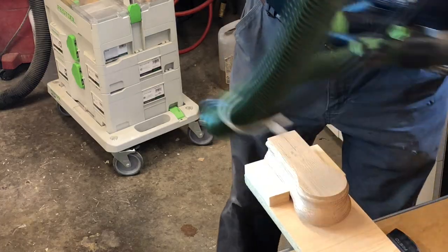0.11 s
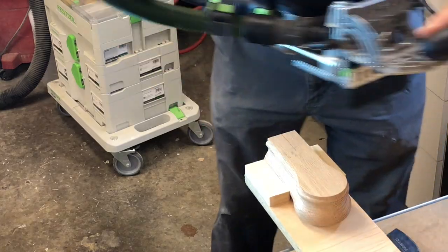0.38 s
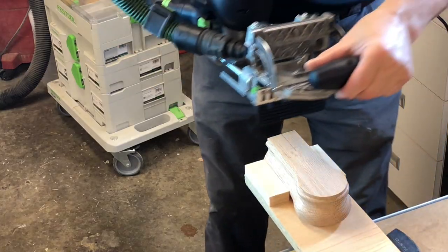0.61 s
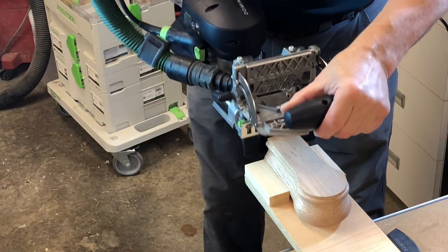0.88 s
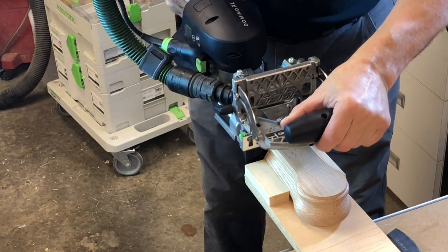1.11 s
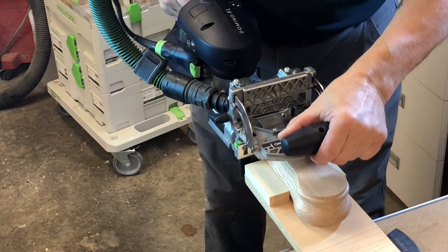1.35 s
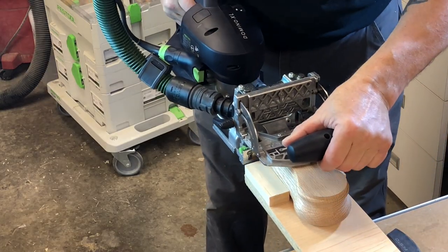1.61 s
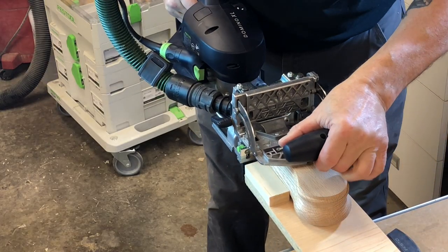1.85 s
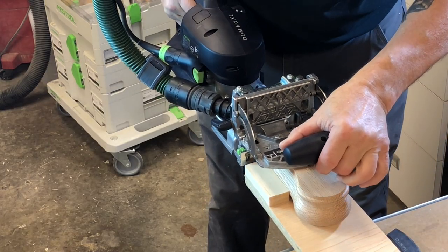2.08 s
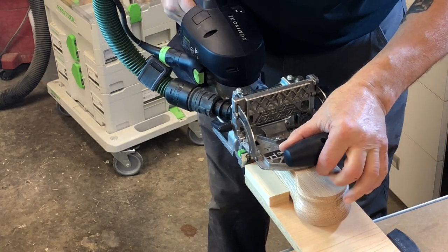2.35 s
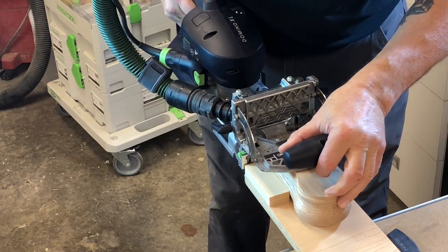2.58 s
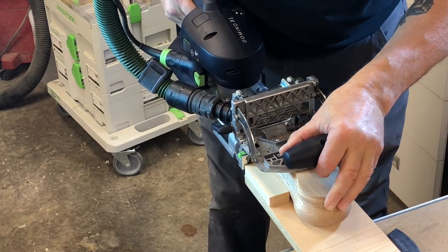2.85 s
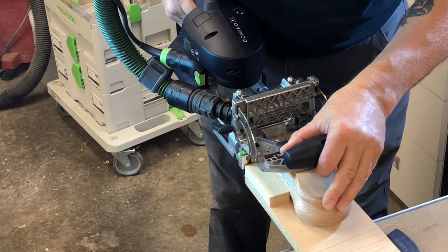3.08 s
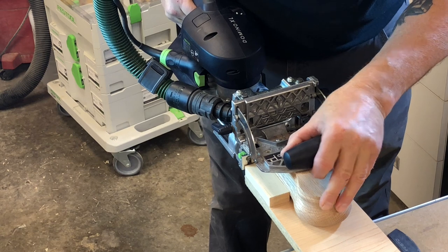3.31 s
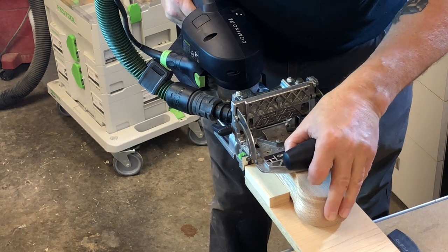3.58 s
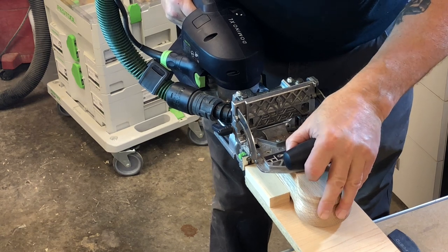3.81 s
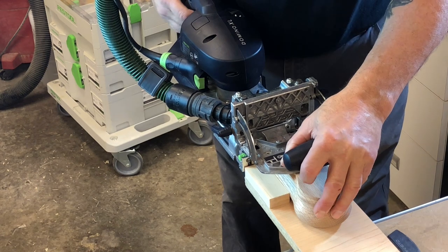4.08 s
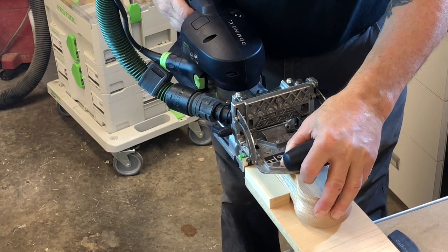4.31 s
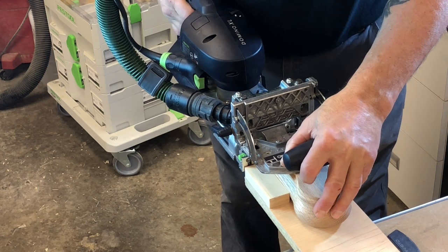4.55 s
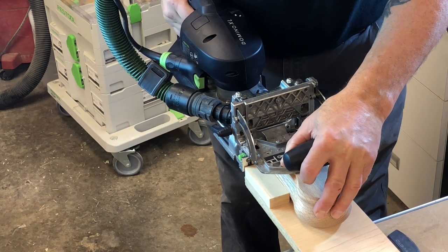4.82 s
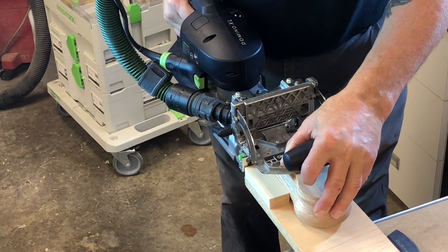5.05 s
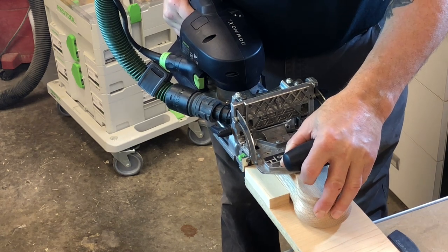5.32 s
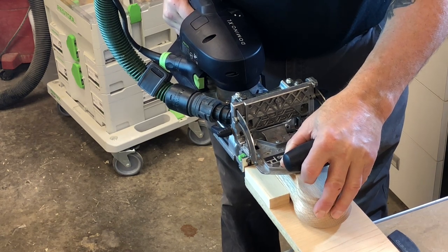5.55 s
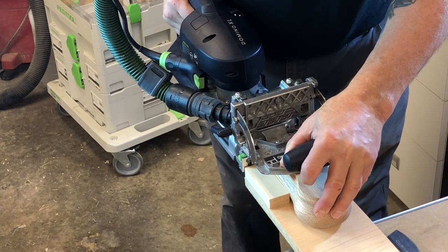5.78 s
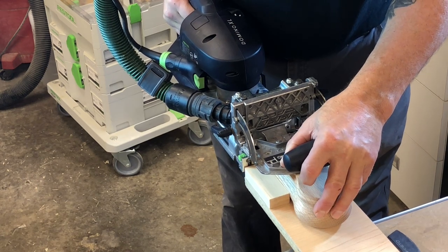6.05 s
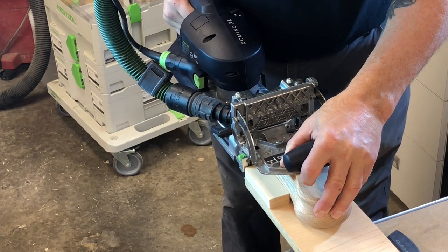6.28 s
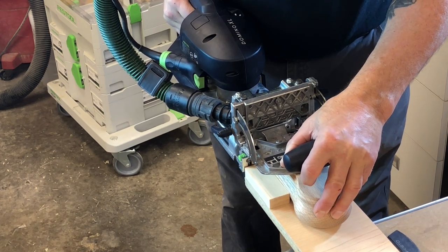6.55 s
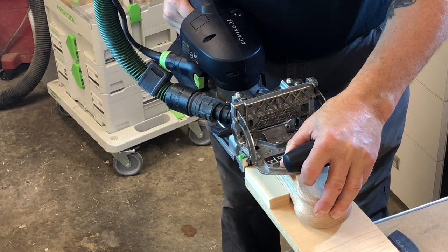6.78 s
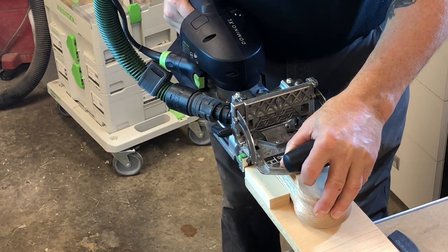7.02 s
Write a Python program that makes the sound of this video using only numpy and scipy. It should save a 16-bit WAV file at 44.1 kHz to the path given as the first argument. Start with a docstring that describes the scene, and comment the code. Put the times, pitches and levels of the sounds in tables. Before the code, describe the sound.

Quiet workshop hum with hose rustle, wooden knocks and switch clicks, then a handheld joiner winds up to a loud steady whine.

```python
"""First comes a humming workshop: mains tones, coloured-noise air and the banded-noise rustle of handling.
Noise-burst clicks and a faint tick about once a second follow, then a hand-held joiner is knocked into
place on a wooden block: struck modes, dense rattle and low bumps. Air starts to roar in one low noise band
and the brush motor growls, then whines up to speed: pulsed noise through housing resonances, fan hiss, and
tones locked to shaft and spindle. About 0.8 s after it starts, the whine of a dust extractor spins up."""
import sys
import numpy as np
from scipy import signal
from scipy.fft import rfft, irfft, next_fast_len
from scipy.io import wavfile
from scipy.ndimage import uniform_filter1d, map_coordinates

SR = 44100
rng = np.random.default_rng(int(sys.argv[2]) if len(sys.argv) > 2 else 0)


def boost_factor(decibels):
    """Convert a level in decibels to a linear amplitude factor."""
    exponent = np.asarray(decibels, float) / 20
    return 10 ** exponent


def waveform_to_disk(signal):
    """Save audio, clipped to [-1, 1], as 16-bit WAV at the path in sys.argv[1]."""
    frames = np.transpose(np.atleast_2d(signal))
    scaled = np.clip(frames, -1, 1) * 32767
    samples = np.round(scaled).astype(np.int16)
    wavfile.write(sys.argv[1], SR, samples)


N = 315315
T = np.arange(N) / SR  # time [s]

# Mains hum: (frequency [Hz], rms level [dB])
HUM_TONES = [(74, -81), (120, -73), (240, -73.5)]
# Spectrum of the room air: (frequency [Hz], relative density [dB per Hz])
AIR_SPECTRUM = [(20, -43), (50, -17.5), (75, -5), (100, -13.5), (200, -8), (400, -13), (1000, -25.5),
                (3000, -33.5), (15000, -42)]
# Hose and sleeves rub: (start [s], length [s], low band [dB], mid band [dB], treble band [dB])
RUBS = [(0, 0.67, -76.5, -80, -86), (0.137, 0.16, -80, -78.5, -81), (1.68, 0.06, -80, -82, -81),
        (2.246, 0.088, -78, -83, -82), (2.41, 0.31, -79, -83.5, -99), (3.289, 0.12, -79.5, -77.5, -75.5),
        (3.43, 0.18, -77.5, -83, -86), (3.65, 0.13, -79, -90, -97), (3.928, 0.21, -78.5, -85, -86),
        (4.415, 0.2, -71, -76, -95)]
# Faint rustle that never stops: (low band [dB], mid band [dB], treble band [dB])
STILL_RUSTLE = (-89.5, -88.5, -90.5)
# Small clicks of fence, hose and switch, with a faint distant tick about once a second:
# (time [s], burst peak [dB], centre [Hz], decay time [ms], casing ring [dB])
CLICKS = [(.395, -53, 11000, 0.65, -17), (0.914, -64.5, 7240, 27, -10), (.975, -65, 2600, 20, -20),
          (1.985, -63, 9000, 24, -7), (3.054, -64, 8950, 25, -21), (3.29, -67, 6000, 6, -16),
          (3.451, -64, 9000, 1.5, -25), (3.607, -65, 2500, 1.5, -10), (3.755, -62, 2000, 1.9, -10),
          (3.936, -51, 3300, 2.3, -3), (3.949, -65, 700, 2.5, -14), (4.038, -58, 2200, 15, -6),
          (4.410, -54, 2520, 4.6, 4.5), (4.466, -67, 1500, 3, 1), (4.545, -36, 5800, 5.8, -2.5),
          (4.572, -44.5, 2000, 2.9, -1.5), (4.597, -58, 1800, 25, 3), (4.783, -58, 3280, 3, -17),
          (4.816, -56, 1500, 5.6, -11)]
# Brief ring under every click, as of plastic and metal parts: (frequency [Hz], relative level [dB], t60 [s])
CASING_MODES = [(604, -20, 0.06), (1030, -11, 0.0084), (1500, 3.5, 0.0051), (1774, -20, 0.09),
                (2200, 3.5, 0.0045), (3120, -2, 0.0032), (7000, -33, 0.038)]
# Tool meets wood: (time [s], ring peak [dB], softness of the blow [ms], boom of the bench [dB],
# chatter while it settles [ms], crack [dB], rattle [dB], top of the rattle [Hz], its strongest band [Hz]);
# crack and rattle stand relative to the ring
KNOCKS = [(1.056, -49, 0.11, 2, 17, -20, -7, 2500, 900), (1.618, -32, 0.1, -10, 0.67, -16, -7, 2000, 950),
          (1.905, -34, 0.064, -1.5, 4.5, -6, -6, 6000, 1430),
          (2.313, -57.5, 0.058, -7, 14, -16, -8, 3500, 1200),
          (2.612, -35, 0.22, -5.5, 5.8, -24, -4, 1500, 1150)]
# Modes of block and bench: (frequency [Hz], relative level [dB], t60 [s])
WOOD_MODES = [(277.6, -3, 0.16), (333, -5, 0.1), (486, -2.5, 0.028), (590, 2, 0.015), (730, 12, 0.0088),
              (840, -4.5, 0.017), (1054, 5, 0.011), (1275, 7.5, 0.0071), (1450, 6, 0.0091),
              (1680, 4, 0.0052), (2050, 4, 0.0054), (2500, 5.5, 0.0049), (3000, 13, 0.0041),
              (3700, 13, 0.0044)]
# Countless small modes of tool and bench blur into noise: (frequency [Hz], t60 [s])
RATTLE_DECAY = [(200, .3), (1000, 0.26), (2000, 0.12), (4000, 0.064)]
# The bench rocks on the floor: (time [s], level before the soft onset [dB], frequency [Hz], t60 [s])
THUMPS = [(1.098, -55, 47.7, 0.53), (1.098, -56, 143, .15), (1.62, -47, 190, .09), (1.908, -53, 215, .09),
          (1.93, -57, 45, .3), (2.616, -49, 147, 0.19), (2.614, -49, 205, .1)]
# Low roar of moving air: (time [s], rms level [dB])
ROAR_LEVEL = [(4.77, -77), (4.92, -56.5), (5.3, -61), (5.6, -51), (6.0, -57), (7.15, -51)]
# Motor speed, a hard pull, then a slow creep to full speed: (time [s], shaft speed [Hz])
MOTOR_SPEED = [(4.78, 34.6), (4.9, 81.9), (5.0, 119.5), (5.05, 142.7), (5.1, 175.6), (5.23, 283.8),
               (5.3, 330), (5.37, 361.3), (5.45, 381), (5.55, 393.6), (5.65, 401.4), (5.8, 408),
               (6.1, 430.2), (6.25, 434.5), (6.55, 442.3), (6.72, 444.3), (6.94, 445.1), (7.15, 445)]
# Noise against speed, before the trims in joiner_noise():
# (shaft speed [Hz], housing growl [dB], fan hiss [dB], brush sizzle [dB])
NOISE_BY_SPEED = [(34.3, -58.5, -66, -87), (50.5, -45.5, -71, -86), (65, -50, -86, -90),
                  (84.5, -39.5, -62, -80), (104, -31, -42.5, -61), (117, -30.5, -39.5, -55),
                  (182, -31.5, -29, -45), (293, -34, -28, -32), (397, -33.5, -24, -29.5),
                  (451.8, -30.5, -23, -27)]
# Housing resonances: (frequency [Hz], width [Hz], relative level [dB], change while slow [dB])
HOUSING = [(351.4, 16, -4, 2), (552.5, 14, 3, -10), (645, 310, -4, 0.5), (720, 25, -13.5, 7),
           (910, 680, -11, 0.5)]
# Spectrum of the fan hiss: (frequency [Hz], relative density [dB per Hz])
HISS_SPECTRUM = [(200, -92), (400, -16), (800, -13.5), (1100, -2.5), (1400, -3), (1900, -4.5), (2600, -5.5),
                 (3600, -2), (5000, -3.5), (7000, -4.5), (8500, -13.5), (10000, -18)]
# Spectrum of the brush sizzle: (frequency [Hz], relative density [dB per Hz])
SIZZLE_SPECTRUM = [(6000, -19.5), (8500, 2), (10000, -2.5), (13000, -10.5), (15500, -6)]
# Strong shaft orders, before the trim in joiner_tones():
# (multiple of the shaft, level at full speed [dB], loss per octave of speed below it [dB])
LOUD_ORDERS = [(1, -40.5, 26.5), (3, -44.5, 17), (4, -34, 40), (5.5, -56.5, 0), (9, -34, 0.5),
               (10.7, -49.5, 0), (12, -40, 11), (17, -38, 64), (18, -32.5, 20)]
# One order sings out or drops away: (middle [s], length [s], multiple of the shaft, change [dB])
LOUD_SWELLS = [(5.03, 0.063, 9, -2), (5.115, 0.053, 9, 3), (5.195, 0.054, 9, -3), (5.25, 0.033, 9, 4),
               (5.3, 0.035, 9, -6), (5.26, 0.088, 5.5, 4.5), (4.5, 0.12, 12, 7), (6.95, 0.29, 4, -4),
               (5.385, 0.12, 9, 7.5), (5.314, 0.13, 18, -3), (5.47, 0.1, 9, 5), (6.0, 0.3, 9, 4),
               (5.9, 0.058, 4, -6.5), (5.325, 0.32, 5.5, 15.5), (5.3, 0.08, 12, 9),
               (5.285, 0.09, 10.7, 14.5), (5.586, 0.39, 9, 3.5), (5.6, 0.21, 3, 12.5), (5.65, 0.4, 4, 10),
               (5.717, 0.33, 5.5, 16), (6.007, 0.22, 3, 10.5), (6.05, 0.16, 4, -7), (5.8, 0.29, 1, 4.5),
               (5.5, 0.2, 9, -24), (6.27, 0.34, 12, 6.5), (6.42, 0.63, 5.5, 23), (6.553, 0.3, 9, 3.5),
               (6.559, 0.12, 12, 6), (6.3, 0.1, 18, -6), (7.19, 0.71, 9, 3)]
# Weaker shaft orders that follow the hiss: (multiple of the shaft, level against the untrimmed hiss [dB])
FAINT_ORDERS = [(2.513, -26), (3.245, -23.5), (6.51, -24.5), (7.48, -21), (11.08, -22), (15.97, -25.5),
                (8.07, -21), (8.5, -24.5), (10.5, -19.5), (12.6, -18), (13, -22), (13.96, -24),
                (14.5, -16.5), (36.5, -25)]
# Cutter spindle: (multiple of the spindle, level at full speed [dB], loss per octave of speed below it [dB])
SPINDLE_ORDERS = [(1, -43, 130), (2, -39.5, 49), (3.5, -45, 71), (4, -39, 68), (12, -39.5, 22)]
# Spindle swells: (middle [s], length [s], multiple of the spindle, change [dB])
SPINDLE_SWELLS = [(6.23, 0.36, 4, -1.02), (6.8, 0.31, 4, 2.4)]
# Current buzz of the slow rotor: (multiple of the mains pulse, peak level [dB])
BUZZ = [(3, -62.5), (5, -60), (6, -54.5), (7, -64), (9, -63)]
# Extractor speed: (time [s], shaft speed [Hz])
EXTRACTOR_SPEED = [(5.56, 186.8), (5.68, 257), (5.8, 311.2), (5.88, 328), (6.0, 365), (6.15, 400),
                   (6.27, 421), (6.45, 430), (7.15, 434)]
# Extractor: (multiple of the shaft, level at full speed [dB], loss per octave of speed below it [dB])
FAN_ORDERS = [(1, -48, 1.9)]
# Extractor swells: (middle [s], length [s], multiple of the shaft, change [dB])
FAN_SWELLS = [(5.7, 0.031, 1, 12.3), (5.85, 0.13, 1, 7.56)]
# Echo decay of the workshop: (frequency [Hz], t60 [s])
ROOM_DECAY = [(125, 0.55), (400, 0.27), (1000, 0.31), (1800, 0.39), (2700, 0.3), (4500, 0.3), (7000, 0.14),
              (15000, 0.3)]

MAINS_PULSE_HZ = 120  # one kick of current each half cycle
BUZZ_END_HZ = 113  # shaft speed at which the buzz has gone
GEAR = .7695  # cutter spindle turns for each turn of the motor


def evened(x):
    """Scales to rms 1."""
    return x / np.sqrt(np.mean(x ** 2) + 1e-20)


def curves(rows):
    """Columns of a table at every sample; the end values hold outside it."""
    s, *columns = np.transpose(rows)
    return [np.interp(T, s, c) for c in columns]


def coloured(x, points):
    """Shapes the spectrum of x by (frequency [Hz], gain [dB]) points on a log frequency axis."""
    f, db = np.transpose(points)
    size = next_fast_len(len(x))
    hz = np.fft.rfftfreq(size, 1 / SR)
    gain_db = np.interp(np.log(hz + 1), np.log(f + 1), db)
    return irfft(rfft(x, size) * boost_factor(gain_db), size)[:len(x)]


def band(lo_hz, hi_hz):
    """Noise between two frequencies, rms 1."""
    sos = signal.butter(3, [lo_hz, hi_hz], "band", fs=SR, output="sos")
    return evened(signal.sosfilt(sos, rng.standard_normal(N)))


def no_bass(x, edge_hz):
    """Small parts radiate no deep bass."""
    return signal.sosfilt(signal.butter(2, edge_hz, "high", fs=SR, output="sos"), x)


def wander(hz):
    """Smooth random curve through hz knots a second, rms 1."""
    knots, s = rng.standard_normal(4000), T[::16]
    return np.interp(T, s, evened(map_coordinates(knots, [s * hz], order=3)))


def resonate(x, hz, width_hz):
    """One resonance of gain 1."""
    r = np.exp(-np.pi * width_hz / SR)
    feedback = [1, -2 * r * np.cos(2 * np.pi * hz / SR), r * r]
    return signal.lfilter([(1 - r * r) / 2, 0, (r * r - 1) / 2], feedback, x)


def modes(table, t):
    """Dying sines from (frequency [Hz], level [dB], t60 [s]) rows; neighbours swing in opposite directions."""
    return sum((-1) ** k * boost_factor(db - 60 * t / t60) * np.sin(2 * np.pi * hz * t)
               for k, (hz, db, t60) in enumerate(table))


def fading_bands(x, decay, frame):
    """Lets each frequency of x die at its own speed, from (frequency [Hz], t60 [s]) rows."""
    hz, t, z = signal.stft(x, SR, nperseg=frame)
    f, t60 = np.transpose(decay)
    fade = boost_factor(-60 * t / np.interp(hz, f, t60)[:, None])
    return signal.istft(z * fade, SR, nperseg=frame)[1]


def rubbing():
    """Gains of the three rustle bands: each rub rises, holds and dies away, adding in power."""
    rise_s, fall_s = 0.0098, 0.037
    power = boost_factor(np.array(STILL_RUSTLE))[:, None] ** 2 * np.ones(N)
    for s, length, *levels_db in RUBS:
        rise = np.clip((T - s) / rise_s, 0, 1)
        shape = rise * np.exp(-np.maximum(T - s - length, 0) / fall_s)
        power = power + (boost_factor(np.array(levels_db))[:, None] * shape) ** 2
    return np.sqrt(power)


def rustle():
    """Friction of hose and sleeves: three noise bands; the ribbed hose whispers in one narrow band."""
    low, mid, treble = rubbing()
    scrape = band(1600, 6400)
    scrape += boost_factor(-3) * resonate(scrape, 4530, 165)
    rub = low * band(340, 1500) + mid * scrape + treble * band(6400, 16000)
    return rub * boost_factor(1.0 * wander(74))


def background():
    """Wavering mains tones and coloured room air, with the rustle of handling."""
    hum = sum(np.sqrt(2) * boost_factor(db + 1.2 * wander(23.04)) * np.sin(2 * np.pi * (hz * T + rng.random()))
              for hz, db in HUM_TONES)
    air = boost_factor(-72.5 + 1.5 * wander(6.05)) * evened(coloured(rng.standard_normal(N), AIR_SPECTRUM))
    return hum + air + rustle()


def clicks():
    """Clicks and faint ticks: short broad bursts, each coloured round its centre, with a brief modal ring."""
    out, t = np.zeros(N), np.arange(SR // 8) / SR
    ring = modes(CASING_MODES, t) * (1 - np.exp(-t / 0.00044))
    for s, db, hz, length_ms, ring_db in CLICKS:
        decay_ms = max(length_ms, .2)
        attack = np.minimum(t * 6000 / decay_ms, 1)  # a sixth of the decay time
        burst = np.exp(-t * 1000 / decay_ms) * attack * rng.standard_normal(len(t))
        burst = 0.5 * burst + resonate(burst, hz, 0.81 * hz)
        burst = signal.lfilter([1, -1], [1, -.94], burst)  # thins the bass
        at = round(s * SR)
        out[at:at + len(t)] += boost_factor(db) * (burst / abs(burst).max() + boost_factor(ring_db) * ring)
    return out


def wood_ring(t, soft_ms, boom_db, chatter_ms, pole):
    """A short push rings the modes of block and bench; soft blows are duller, small rebounds strike again."""
    spread_db = 2 * rng.standard_normal(len(WOOD_MODES))  # no two blows land alike
    shift = 1 + .015 * rng.standard_normal(len(WOOD_MODES))
    struck = []
    for (hz, db, t60), change_db, factor in zip(WOOD_MODES, spread_db, shift):
        dull_db = 40 * soft_ms * max(np.log2(hz / 1400), 0)
        struck.append((hz * factor, db + change_db + boom_db * (hz < 400) - dull_db, t60))
    ring = modes(struck, t) * (1 - np.exp(-t / 0.0009))  # the contact spreads over a moment
    ring = no_bass(ring, 210)
    rebounds = (rng.random(len(t)) < 1600 / SR) * rng.uniform(-.25, .25, len(t))
    rebounds *= np.exp(-t * 1000 / max(chatter_ms, .3))
    ring += signal.fftconvolve(ring, rebounds)[:len(t)]
    return signal.lfilter([1], [1, -2 * pole, pole ** 2], ring)


def rattle(t, pole, top_hz, strong_hz):
    """Dense small modes as noise that dies band by band, strongest round one frequency."""
    dense = fading_bands(rng.standard_normal(len(t)), RATTLE_DECAY, 128)[:len(t)]
    dense = signal.lfilter([1, -1], np.poly([pole, pole, 0.97]), dense * np.minimum(t / 0.0028, 1))
    dense = resonate(dense, 1000, 2200) + 1.5 * resonate(dense, strong_hz, 250)
    return signal.sosfilt(signal.butter(3, top_hz, fs=SR, output="sos"), dense)


def knocks():
    """Each blow joins the ring of the wood, a dense rattle and the crack of contact."""
    out, t = np.zeros(N), np.arange(SR // 3) / SR
    for s, db, soft_ms, boom_db, chatter_ms, crack_db, rattle_db, top_hz, strong_hz in KNOCKS:
        pole = np.exp(-1 / (max(soft_ms, .01) * SR / 1000))  # a softer push passes less treble
        ring = wood_ring(t, soft_ms, boom_db, chatter_ms, pole)
        dense = rattle(t, pole, top_hz, strong_hz)
        crack = boost_factor(crack_db - 60 * t / 0.035) * np.diff(rng.standard_normal(len(t) + 1)) / 2
        crack = resonate(crack, 4200, 3300)
        blow = ring / abs(ring).max() + boost_factor(rattle_db) * dense / abs(dense).max() + crack
        at = round(s * SR)
        out[at:at + len(t)] += boost_factor(db) * blow
    return out


def thumps():
    """The bench rocks: low bumps that swell for a moment and die."""
    out = np.zeros(N)
    for s, db, hz, t60 in THUMPS:
        after = np.maximum(T - s, 0)
        out += modes([(hz, db, t60)], after) * (1 - np.exp(-after / 0.0049))
    return out


def moving_air():
    """The low roar of moving air: one noise band that surges and eases."""
    return (T > ROAR_LEVEL[0][0]) * boost_factor(curves(ROAR_LEVEL)[0]) * band(225.4, 315)


def order_levels(shaft_hz, orders, swells):
    """Each order grows with speed, and swells or dips as a smooth flat-topped bump."""
    octaves = np.log2(shaft_hz / shaft_hz.max())
    levels_db = []
    for k, db, slope_db in orders:
        level_db = db + slope_db * octaves
        for s, length, of, change_db in swells:
            if round(2 * of) == round(2 * k):
                level_db = level_db + change_db * np.exp(-(2 * (T - s) / length) ** 4)
        levels_db.append(level_db)
    return levels_db


def whine(shaft_hz, orders, levels_db, flutter_db, blur, wobble):
    """One wavering tone for each multiple of a turning shaft; a shaft that gains speed runs rougher."""
    break_db, fuzz = 1.2, .33  # higher tones come and go; gear rattle spreads a rough skirt round each
    turns = np.cumsum(shaft_hz) / SR
    strain = 1 + uniform_filter1d(np.gradient(shaft_hz) * SR, size=2000) / 140  # 140 Hz/s adds 1
    twist = turns + wobble * np.sin(2 * np.pi * turns / 4.6)  # a slower gear tugs every 4.6 turns
    twist = twist + .008 * (strain - 1) * wander(90)  # it gains speed in jerks
    out = 0
    for k, db in zip(orders, levels_db):
        level = np.sqrt(2) * boost_factor(db + flutter_db * wander(60) + break_db * (k > 2) * wander(30))
        skirt = 1 + fuzz * np.clip((k - 2) / 7, 0, 1) * wander(260)
        phase = 2 * np.pi * (k * twist + rng.random()) + blur * strain * wander(150)
        out = out + level * skirt * np.sin(phase)
    return out


def joiner_noise(shaft_hz, slow, growl_db, hiss_db, sizzle_db):
    """Mains pulses shake the housing; fan air hisses and brushes sizzle unevenly round each turn."""
    kick = np.exp(-(T * MAINS_PULSE_HZ % 1) / 0.87)
    depth = np.clip(1.1 - shaft_hz / 250, .1, 1)  # felt most while the rotor is slow
    drive = (1 - depth + depth * evened(kick)) * rng.standard_normal(N)
    growl = sum(boost_factor(db + slow_db * slow) * resonate(resonate(drive, hz, 3 * width), hz, width)
                for hz, width, db, slow_db in HOUSING)
    uneven = 1 + 0.053 * np.cos(2 * np.pi * np.cumsum(shaft_hz) / SR)
    rush = uneven * boost_factor(0.41 * wander(90)) * rng.standard_normal(N)
    noise = boost_factor(growl_db - 5.0) * evened(growl)
    noise += boost_factor(hiss_db - 1.58) * evened(coloured(rush, HISS_SPECTRUM))
    return noise + boost_factor(sizzle_db - 2.5) * evened(coloured(rush, SIZZLE_SPECTRUM))


def joiner_tones(shaft_hz, hiss_db):
    """Fan blades, gears and cutter spindle sing at multiples of their turning speed."""
    loud_db = order_levels(shaft_hz, LOUD_ORDERS, LOUD_SWELLS)
    tones = boost_factor(-0.86) * whine(shaft_hz, [k for k, *_ in LOUD_ORDERS], loud_db,
                               flutter_db=1.5, blur=0.092, wobble=0.0022)
    tones *= np.clip((shaft_hz - 110) / 50, 0, 1)  # buried while slow
    faint_db = [hiss_db + db for _, db in FAINT_ORDERS]
    tones += whine(shaft_hz, [k for k, _ in FAINT_ORDERS], faint_db,
                   flutter_db=2.0, blur=0.41, wobble=0.0025)
    spindle_hz = GEAR * shaft_hz
    spindle_db = order_levels(spindle_hz, SPINDLE_ORDERS, SPINDLE_SWELLS)
    return tones + whine(spindle_hz, [k for k, *_ in SPINDLE_ORDERS], spindle_db,
                         flutter_db=1.5, blur=0.14, wobble=0)


def current_hum(slow, hiss_db):
    """The field coil hums at the mains pulse; a slow rotor adds buzzing multiples of it."""
    coil = boost_factor(hiss_db - 35.5 + 2.2 * wander(25)) * np.sin(2 * np.pi * MAINS_PULSE_HZ * T)
    buzz = sum(boost_factor(db + 4 * wander(90)) * np.sin(2 * np.pi * k * MAINS_PULSE_HZ * T + 1.2 * wander(60))
               for k, db in BUZZ)
    onset = np.clip((T - MOTOR_SPEED[0][0]) / .012, 0, 1)
    return coil + slow * onset * buzz


def joiner():
    """One shaft speed steers growl, hiss, sizzle, whine and current hum from switch-on."""
    shaft_hz = curves(MOTOR_SPEED)[0]
    at_hz, *levels_db = np.transpose(NOISE_BY_SPEED)
    growl_db, hiss_db, sizzle_db = [np.interp(shaft_hz, at_hz, c) for c in levels_db]
    slow = np.clip((BUZZ_END_HZ - shaft_hz) / 20, 0, 1)
    sound = joiner_noise(shaft_hz, slow, growl_db, hiss_db, sizzle_db)
    sound = sound + joiner_tones(shaft_hz, hiss_db) + current_hum(slow, hiss_db)
    return no_bass((T > MOTOR_SPEED[0][0]) * sound, 70)


def extractor():
    """A second motor starts late and whines at its shaft speed."""
    shaft_hz = curves(EXTRACTOR_SPEED)[0]
    levels_db = order_levels(shaft_hz, FAN_ORDERS, FAN_SWELLS)
    rise = np.clip((T - EXTRACTOR_SPEED[0][0]) / 0.072, 0, 1)
    return rise * whine(shaft_hz, [k for k, *_ in FAN_ORDERS], levels_db,
                        flutter_db=0.5, blur=0.031, wobble=0)


def workshop_echoes(x):
    """Sparse echoes of random sign, each band dying at its own speed."""
    taps = np.zeros(SR)
    at = np.arange(60, SR - 20, 20)
    taps[at + rng.integers(0, 20, len(at))] = rng.choice([-1., 1.], len(at))
    tail = fading_bands(taps, ROOM_DECAY, 256)
    return signal.fftconvolve(x, tail / np.linalg.norm(tail))[:N]


def scene():
    """All sources reach one microphone, alike in both channels; knocks, clicks and machines also echo."""
    ambience, small, wood, bumps = background(), clicks(), knocks(), thumps()
    machines = moving_air() + joiner() + extractor()
    echoes = workshop_echoes(boost_factor(-6) * wood + boost_factor(-2.5) * small + boost_factor(-14) * machines)
    mix = wood + small + machines + echoes + bumps + ambience
    return np.array([mix, mix])


def top_cut(x):
    """Nothing passes above the cut-off."""
    return signal.sosfilt(signal.butter(12, 17060, fs=SR, output="sos"), x)


def record(dry):
    """A steep low-pass at 15.9 kHz limits the band of the finished mix."""
    lowpass = signal.firwin(1023, 15900, window=("kaiser", 10), fs=SR)
    limited = signal.oaconvolve(dry, lowpass[None], "same")
    return top_cut(limited)


dry = scene()
out = record(dry)
waveform_to_disk(out)
```